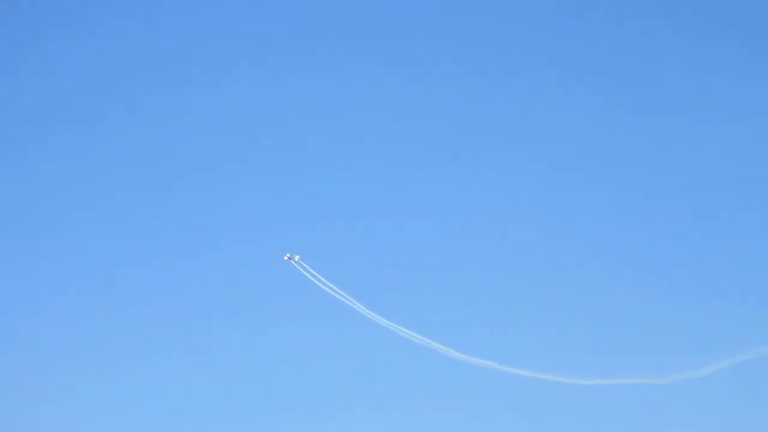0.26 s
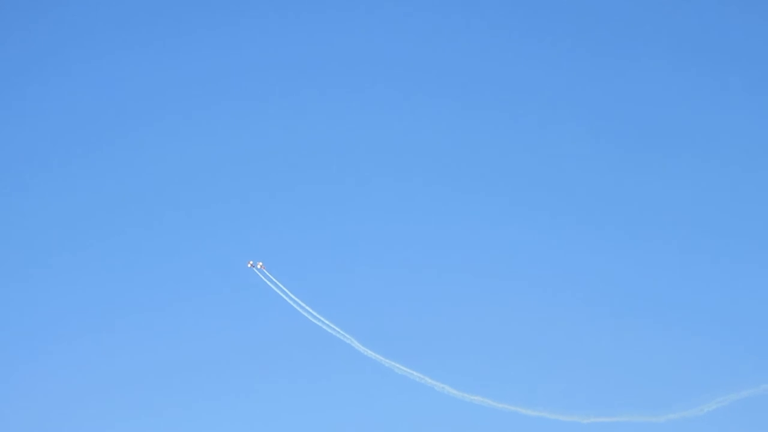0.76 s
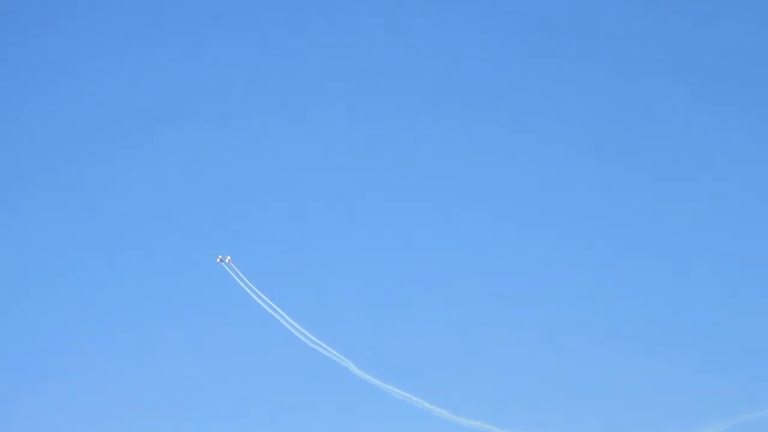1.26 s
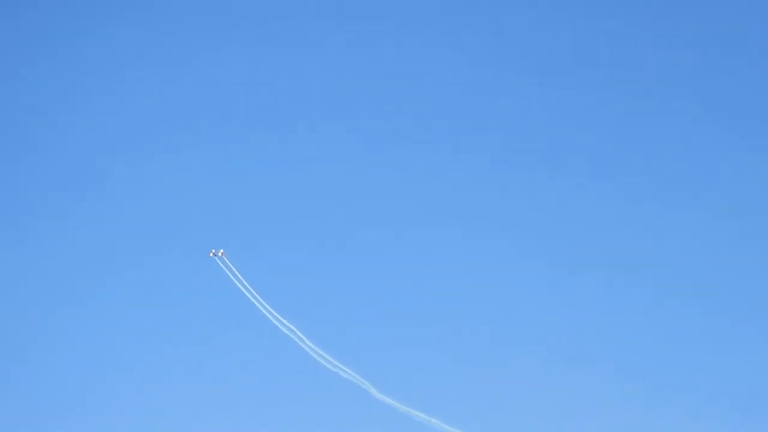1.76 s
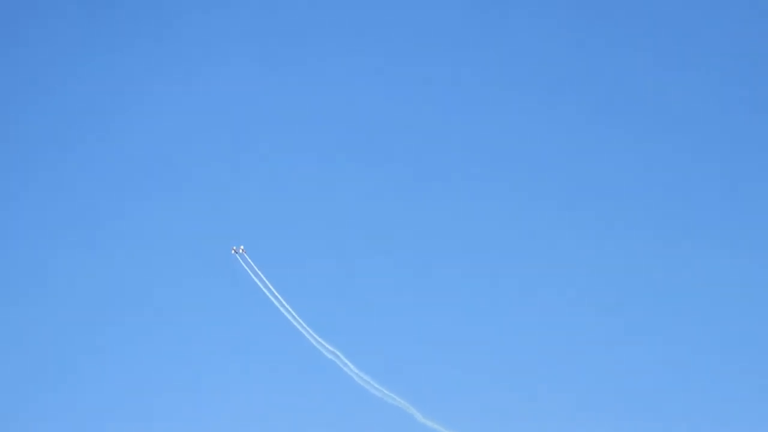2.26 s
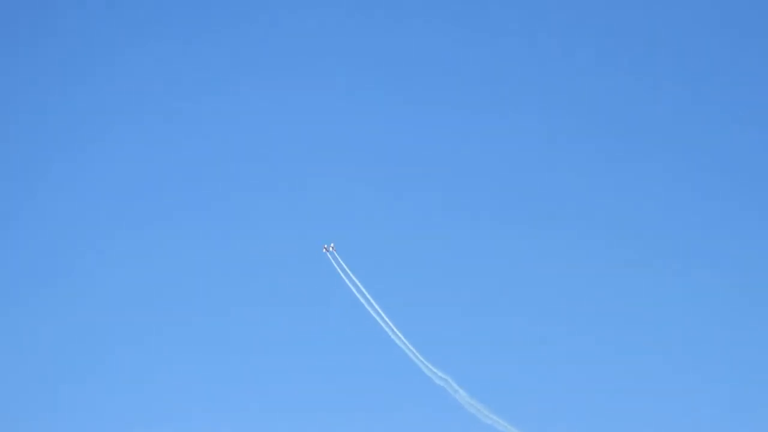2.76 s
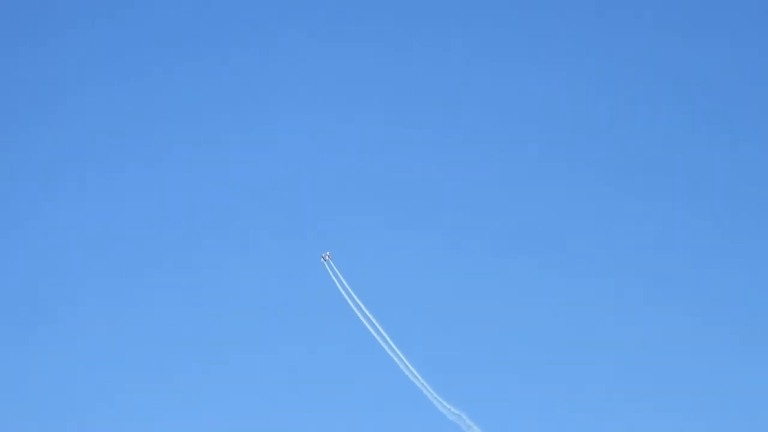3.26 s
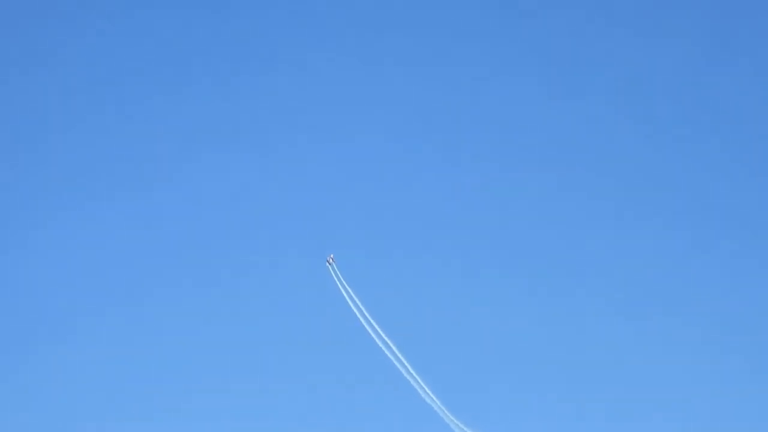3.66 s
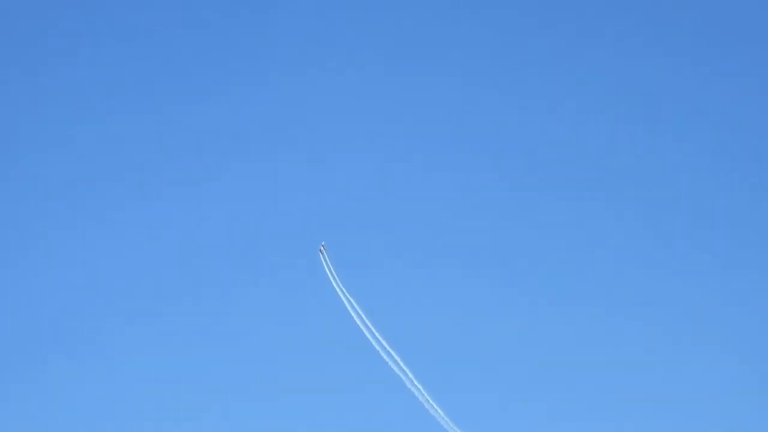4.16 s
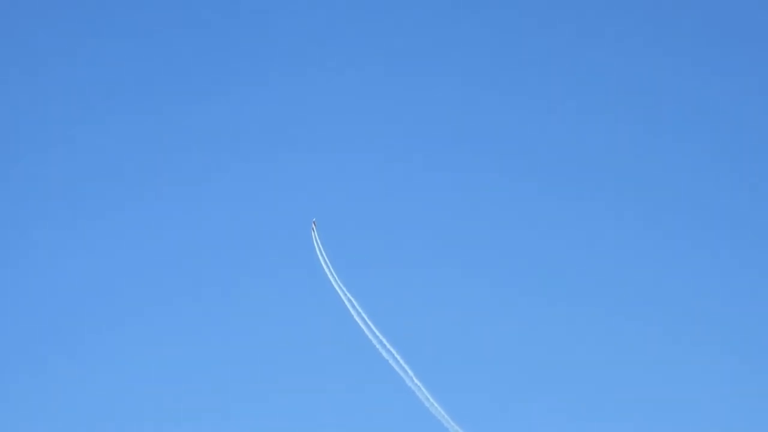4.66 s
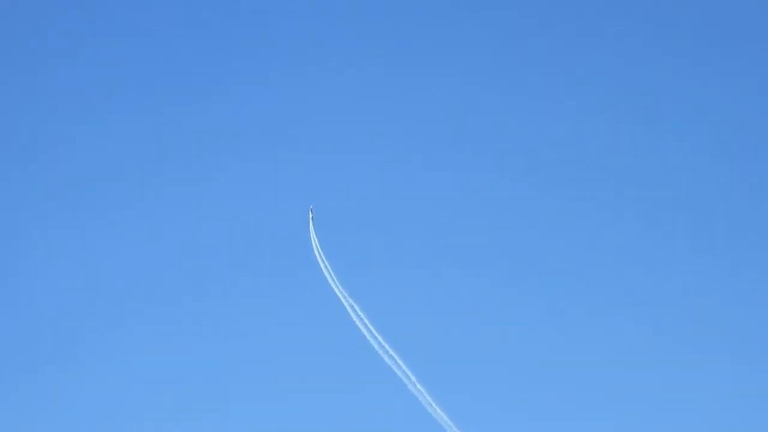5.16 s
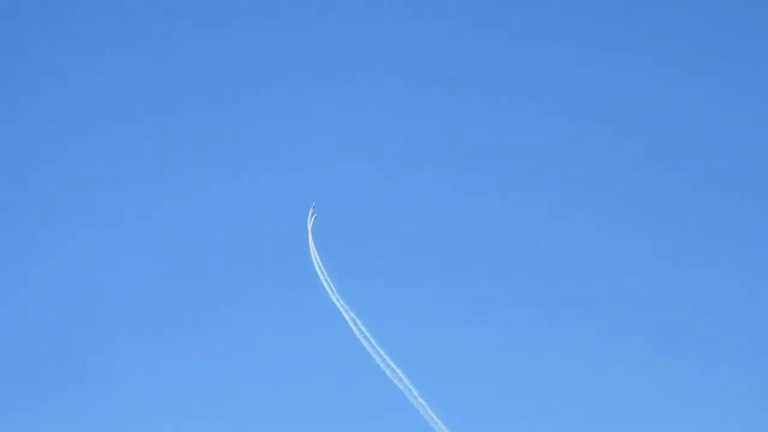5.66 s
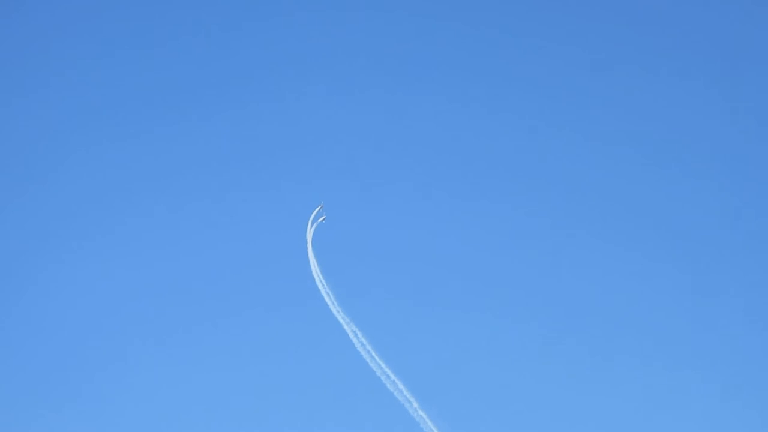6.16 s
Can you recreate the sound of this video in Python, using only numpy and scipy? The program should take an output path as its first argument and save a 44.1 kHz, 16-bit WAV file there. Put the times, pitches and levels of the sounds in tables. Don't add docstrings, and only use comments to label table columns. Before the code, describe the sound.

Distant twin propeller drone throbs and wavers across open sky, climbing slightly in pitch, with plastic handling clicks, soft insect hiss and one late knock.

```python
import sys
import numpy as np
from scipy import signal
from scipy.io import wavfile
from scipy.ndimage import uniform_filter1d

SR = 44100
rng = np.random.default_rng(int(sys.argv[2]) if len(sys.argv) > 2 else 0)


def dump(signal):
    limited = np.clip(np.atleast_2d(signal).T, -1, 1)
    pcm = np.round(limited * 32767).astype(np.int16)
    wavfile.write(sys.argv[1], SR, pcm)


def invert_db(x):
    u = np.asarray(x, float) / 20
    return 10 ** u


N = 282240

# freq_hz, level_db (per Hz)
AIR_COLOUR = [(20, -30), (45, -13.5), (85, -6), (125, -14.5), (200, -10.5), (300, -10.5), (600, -13.5),
              (1670, -21), (2600, -28.5), (4140, -34.5), (6000, -38), (8000, -39.5), (10500, -43.5),
              (15000, -50)]
AIR_DB = -44
# top_s, half_width_s, rise_db
WIND_GUSTS = [
    (.8, .8, -1),
    (3.6, .6, -3),
    (4.5, .3, 6),
    (5.25, .12, 15),
]
WIND_DB = -57
# centre_hz, width_hz, level_db
FUZZY_BANDS = [(8010, 680, -70.5), (1248, 46, -66.5), (1956, 28, -95), (9720, 1700, -74.5)]
# top_s, half_width_s, rise_db
CRICKET_BOUTS = [
    (.7, 0.28, 12),
    (1.13, 0.26, 18),
    (2, .35, 11),
    (6.4, 2.5, 7),
]
CRICKET_DB = -87
# top_s, half_width_s, rise_db
WHIRR_BOUTS = [
    (2.3, 0.42, 6.6),
    (4.4, 0.45, 4.5),
    (5.6, 0.96, 2.8),
]
WHIRR_DB = -63
# time_s, firing_hz, level_db
MOTOR_SPEED = [(0, 87.2, -48), (1.3, 89.74, -55.5), (2.8, 86.95, -55.5), (3.8, 85.9, -54),
               (4.6, 86.1, -54.5), (6.4, 88.3, -51.5)]
# multiple, level_db
MOTOR_ORDERS = [(2, -2), (3, -1), (4, -6.5), (5, -11), (6, -10.5)]
# start_s, length_s, start_hz, end_hz, level_db
BIRD_NOTES = [(.505, .045, 2950, 3480, -57), (.54, .045, 3520, 3490, -54.5), (.515, .04, 4600, 5200, -66),
              (.6, .09, 2030, 2020, -60), (.95, .07, 2020, 2020, -61), (3, .035, 660, 620, -47),
              (4.635, .06, 2350, 3050, -58), (4.7, .1, 2080, 2040, -61), (4.98, .14, 2390, 2340, -62.5),
              (5.13, .16, 1440, 1280, -51), (5.25, .12, 2250, 2440, -66), (5.39, .03, 3620, 3480, -61),
              (5.4, .05, 3050, 3240, -61), (5.52, .1, 3510, 3510, -65), (5.8, .27, 2800, 2790, -63)]
# start_s, peak_db
TICKS = [(0.467, -35), (0.4843, -38), (0.5066, -37), (0.5242, -38), (0.84, -41), (0.8672, -33.5),
         (0.9834, -39), (1.2311, -42), (1.267, -36), (1.9105, -40), (2.0023, -39), (2.0677, -38),
         (2.0941, -41), (2.1335, -36), (2.161, -35), (2.2016, -35), (2.4224, -40), (2.4695, -36),
         (2.496, -37), (2.5346, -37), (5.906, -35), (6.2028, -40), (6.2392, -37), (6.277, -37.5),
         (6.3056, -41)]
# freq_hz, level_db, t60_s
TICK_MODES = [(1330, 8, 0.017), (1800, -7, .012), (2040, -29, 0.0052), (2714, 13.5, 0.0082),
              (3140, 13.5, 0.0052), (3470, -8, 0.0033)]
# start_s, peak_db, low_edge_hz, high_edge_hz, t60_s
SNAPS = [
    (.8664, -50, 6500, 8500, .005),
    (.9837, -41, 7000, 11500, .005),
    (1.7907, -43, 6200, 16000, .004),
    (1.7962, -47, 10000, 16000, .004),
    (1.8205, -33, 6200, 15000, .005),
    (1.826, -47, 6000, 13000, .025),
]
# start_s, peak_db
KNOCK = (5.7612, -20)
# freq_hz, level_db, t60_s
KNOCK_MODES = [(1270, 0, .022), (1500, -3, .018), (1750, -4, .016), (2100, -5, .014), (2500, 0, .02),
               (2950, -2, .018), (3450, -6, .018)]
# top_s, half_width_s, rise_db, treble_rise_db
ROAR_SWELLS = [
    (.3, 0.56, 9.7, 12.5),
    (2.65, 0.23, 3.3, -6),
    (3.9, .25, 6.8, -6),
    (4.5, 0.55, 2.5, 3.5),
    (5.2, 0.17, 4.4, -4),
    (6.0, 0.19, 7.3, 7),
]
# freq_hz, level_db
ROAR_COLOUR = [(60, -25), (120, -21), (250, -4.5), (400, -12), (600, -1.5), (900, -4), (1400, -13.5),
               (2200, -26), (3500, -35.5), (6000, -63)]
ROAR_DB, TREBLE_DB = -47.5, 3.5
CRANK_LINES = [(0, .875), (0, 5.25), (1, 5.25), (1, 8), (0, 6.5), (1, 3.75), (1, 4.25), (1, 10)]
# top_s, half_width_s, top_db
CRANK_SWELLS = [(4, 2.1, -49), (4.3, 0.92, -56.5), (3.03, 1.6, -52), (1.95, .8, -54.5), (4.9, 0.53, -49),
                (.35, .35, -51), (.35, .35, -48), (6.06, 0.23, -52.5)]
CRANK_REST_DB = -69
# time_s, rate_hz
BLADES_A = [(0.0, 75.645), (0.44, 75.862), (0.99, 75.133), (1.49, 75.658), (2.04, 75.31), (2.82, 76.73),
            (2.95, 76.589), (3.88, 78.156), (4.49, 79.996), (4.98, 80.521), (5.35, 81.755), (6.4, 83.615)]
# time_s, rate_hz
BLADES_B = [(0.0, 79.621), (0.32, 81.157), (0.49, 81.106), (0.91, 77.33), (1.06, 76.985), (1.95, 78.793),
            (2.29, 78.926), (2.69, 81.427), (3.08, 81.217), (3.5, 83.503), (3.84, 83.666), (4.28, 82.554),
            (4.91, 84.061), (5.19, 85.108), (5.32, 85.273), (5.63, 83.561), (6.07, 87.713), (6.4, 89.276)]
# time_s, nearness_db, disc_edge_on_db, exhaust_facing_db
FLIGHT_A = [(0.0, -35.5, -0.5, 6), (0.98, -34.5, 0.3, 2.5), (1.23, -35, 0, -3.5), (1.48, -41, 2, 8.5),
            (1.72, -38.5, -2, 5.5), (1.97, -38, 0.7, 4.5), (2.22, -34.5, -0.5, 9), (2.46, -39, -3.8, 3.5),
            (3.45, -31.5, 1.5, -6.5), (3.69, -37, 3.5, 8.5), (4.43, -34.5, 2.0, -3), (4.92, -32, 6.5, -0.5),
            (5.42, -33.5, -0.5, -7.5), (5.66, -42.5, 8, 9), (5.91, -31, 0.5, -11), (6.4, -37, 8.5, -6)]
# time_s, nearness_db, disc_edge_on_db, exhaust_facing_db
FLIGHT_B = [(0.0, -35, -7, 1.5), (0.25, -35.5, -7.5, 5), (0.49, -31.5, -7.5, -2), (0.74, -40.5, -11, -7.8),
            (1.97, -37.5, -0.7, -8.5), (2.46, -31.5, 1.5, -7.5), (3.2, -34, 6.5, -0.5), (3.94, -31.5, 8, 8),
            (4.43, -37, 3, 7.5), (4.68, -35.3, 6, 11), (4.92, -29.5, 3.5, 3.5), (5.17, -32, 11.5, 7.5),
            (5.42, -40, 18, 11.5), (5.66, -33.5, 4.1, -1), (5.91, -40.5, 12, 11.5), (6.4, -36.5, 5.5, 11.5)]
# level_db, turn_share, exhaust_share
ORDERS_A = [(-1.5, -1.34, 0.28), (-9.5, 1.4, 0.24), (-7, 0.7, -0.14), (-15.5, 0.24, 1.22),
            (-18, 1.13, 1.06), (-20, -0.48, 0.6), (-23.5, -1.3, 0.33)]
# level_db, turn_share, exhaust_share
ORDERS_B = [(-1.8, -0.95, -0.058), (-7, 0.98, -0.16), (-6.5, 0.43, -0.08), (-14, -0.33, 1.02),
            (-15.5, 0.38, 0.68), (-22, -0.024, 1.1), (-22, -0.58, 0.42)]
# order, level_db
HALF_ORDERS = [(2.5, -19), (3.5, -12.5), (4.5, 0.5), (5.5, 1.5), (6.5, -6), (7.5, -18), (8.5, -6),
               (9.5, -11.5), (10.5, -9.5), (11.5, -12)]
SHAPES = [
    (.165, -1.9, -1.8),
    (.334, -1.7, -1.3),
]
# time_s, delay_ms, strength (0-1)
GROUNDS = [
    [(0, 2.97, 0.7), (1.5, 3.3, 1), (2.3, 3.55, 1), (2.7, 2.3, 0.4), (3, 2.33, .8), (3.4, 2.0, .4),
     (4.2, 1.8, 0.9), (4.6, 1.44, 0.26), (6.4, 1.3, 0.1)],
    [(0, 3.6, 0.25), (1.5, 3.24, .6), (2.2, 2.93, 0.8), (2.7, 2.4, 0.33), (3.1, 2.3, 0.74), (3.5, 1.8, .3),
     (4.5, 1, 0.34), (5.5, 2.7, .3), (6.4, 1.1, 0.46)],
]
# top_s, half_width_s, pipe_boom_db,
# uneven_firing_db
SURGES = [
    [(.3, 0.4, 1, -5), (1.9, 0.59, -14.5, 0), (4.2, .4, -8, 6), (5.3, .5, 7, -6)],
    [(.3, .3, 3.5, 4.5), (1.6, .5, -6, -1), (3.8, 0.3, 1.5, 7.5), (5.3, .6, 2, -6)],
]
# top_s, half_width_s, ring_db, bass_db
RINGS = [
    [(.3, .4, 3, -2), (4.9, .4, 8, -2), (6.25, 0.22, .5, -22)],
    [(.4, .5, -10, .5), (3.8, 0.37, 5, 2), (4.7, 0.24, 0, -1), (5.9, .2, -3, 2)],
]


def evened(x):
    return x / np.sqrt(np.mean(x ** 2) + 1e-20)


def curves(rows):
    s, *columns = np.transpose(rows)
    return [np.interp(np.arange(N) / SR, s, column) for column in columns]


def swells(rows):
    s, width, *rises = np.transpose(rows)
    bells = np.exp(-((np.arange(N) / SR - s[:, None]) / width[:, None]) ** 2)
    return [rise @ bells for rise in rises]


def drift(hz):
    f = np.geomspace(hz / 16, hz, num=16)[:, None]
    t = np.arange(0, N + 256, 256) / SR
    waves = np.sin(2 * np.pi * (f * t + rng.random(f.shape))) / f ** 0.34
    return np.interp(np.arange(N) / SR, t, evened(waves.sum(0)))


def noise(colour, patchy_db):
    frames, hz = N // 256 + 5, np.fft.rfftfreq(1024, 1 / SR)
    real, imag, patches = rng.standard_normal((frames, 513, 3)).T
    patches = uniform_filter1d(patches, size=8, axis=0)
    patches = evened(uniform_filter1d(patches, size=14, axis=1))
    f, db = np.transpose(colour)
    colour_db = np.interp(np.log(hz + 1), np.log(f + 1), db, right=-120)
    spectra = (real + 1j * imag) * invert_db(colour_db[:, None] + patchy_db * patches)
    return evened(signal.istft(spectra, nperseg=1024, noverlap=768)[1][:N])


def fuzz(hz, width):
    r = np.exp(-np.pi * width / SR)
    z = rng.standard_normal(N) + 1j * rng.standard_normal(N)
    z = signal.lfilter([1], np.convolve([1, -r], [1, -r]), z)
    return evened((z * np.exp(2j * np.pi * hz * np.arange(N) / SR)).real)


def tone(turns, db, lag=0):
    return np.sqrt(2) * invert_db(db) * np.cos(2 * np.pi * turns + lag)


def add(mix, s, sound):
    part = mix[round(s * SR):][:len(sound)]
    part += sound[:len(part)]


def soft_contact(t, rise_s):
    return np.sin(np.pi / 2 * np.minimum(t / rise_s, 1)) ** 2


def open_air():
    floor = invert_db(AIR_DB) * noise(AIR_COLOUR, patchy_db=1.0)
    return floor + sum(invert_db(db + 1.5 * drift(9)) * fuzz(hz, width) for hz, width, db in FUZZY_BANDS)


def wind():
    rumble = noise([(15, -6), (35, 0), (60, -3), (110, -14), (250, -40)], patchy_db=2)
    return invert_db(WIND_DB + swells(WIND_GUSTS)[0]) * rumble


def cricket():
    return invert_db(CRICKET_DB + swells(CRICKET_BOUTS)[0] + 2.0 * drift(30)) * fuzz(6950, 350)


def camera_drive():
    return invert_db(WHIRR_DB + swells(WHIRR_BOUTS)[0] + 2.0 * drift(17)) * fuzz(1640, 150)


def field_motor():
    hz, db = curves(MOTOR_SPEED)
    turns = np.cumsum(hz) / SR
    return sum(tone(k * turns + .05 * drift(3), db + order_db + 2.5 * drift(4))
               for k, order_db in MOTOR_ORDERS)


def birds():
    out = np.zeros(N)
    for s, length, start_hz, end_hz, db in BIRD_NOTES:
        u = np.linspace(0, 1, round(length * SR))
        hz = start_hz + (end_hz - start_hz) * (1 - (1 - u) ** 1.62)
        add(out, s, tone(np.cumsum(hz) / SR, db) * np.sqrt(np.sin(np.pi * u) + 1e-9))
    out = out * invert_db(1.2 * drift(70))
    echo_db, echo_t60_s = -11, 0.63
    t = np.arange(SR // 2) / SR
    tail = rng.standard_normal(len(t)) * invert_db(-60 * t / echo_t60_s)
    return out + invert_db(echo_db) * signal.oaconvolve(out, tail / np.linalg.norm(tail))[:N]


def ticks():
    out, t = np.zeros(N), np.arange(1200) / SR
    chance = rng.standard_normal((len(TICKS), len(TICK_MODES), 2))
    for (s, db), each in zip(TICKS, chance):
        ring = sum(invert_db(mode_db + 2.0 * a - 60 * t / t60) * np.sin(2 * np.pi * hz * (1 + 0.012 * b) * t)
                   for (hz, mode_db, t60), (a, b) in zip(TICK_MODES, each))
        ring = ring * soft_contact(t, .0007)
        add(out, s, invert_db(db) * ring / abs(ring).max())
    return out


def snaps():
    out, t = np.zeros(N), np.arange(1200) / SR
    for s, db, low_hz, high_hz, t60 in SNAPS:
        burst = rng.standard_normal(len(t)) * invert_db(-60 * t / t60)
        band = signal.butter(4, [low_hz, high_hz], "band", fs=SR, output="sos")
        crack = signal.sosfilt(band, burst)
        add(out, s, invert_db(db) * crack / abs(crack).max())
    return out


def knock():
    out, t = np.zeros(N), np.arange(2000) / SR
    s, peak_db = KNOCK
    ring = sum(invert_db(db - 60 * t / t60) * np.cos(2 * np.pi * hz * (t - .001)) for hz, db, t60 in KNOCK_MODES)
    ring = ring * soft_contact(t, .001)
    add(out, s, invert_db(peak_db) * ring / abs(ring).max())
    return out


def airframe_roar(turns, throb=0.12, limp=0.098):
    rise_db, treble_db = swells(ROAR_SWELLS)
    rush = noise(ROAR_COLOUR, patchy_db=1.5)
    high = signal.sosfilt(signal.butter(2, 1400, "high", fs=SR, output="sos"), rush)
    chop = 1 + throb * (np.cos(2 * np.pi * turns[0]) + np.cos(2 * np.pi * turns[1]))
    chop = chop + limp * np.cos(np.pi * (turns[1] + SHAPES[1][0]))
    return invert_db(ROAR_DB - 2) * (invert_db(rise_db) * (rush - high) + invert_db(TREBLE_DB + treble_db) * high) * chop


def cranks(turns):
    out = np.zeros(N)
    for (p, k), (s, width, top_db) in zip(CRANK_LINES, CRANK_SWELLS):
        swell_db = swells([(s, width, top_db - CRANK_REST_DB)])[0]
        out += tone(k * turns[p], CRANK_REST_DB + swell_db + 1.5 * drift(6))
    return out


def order_levels(flight, law, surges, rings):
    near, edge, pipe = curves(flight)
    *low, top, half = [near + db + a * edge + b * pipe for db, a, b in law]
    boom_db, uneven_db = swells(surges)
    ring_db, bass_db = swells(rings)
    low[0] = low[0] + bass_db
    low[3] = low[3] + boom_db
    half = half + uneven_db
    orders = list(enumerate(low, start=1))
    for k in range(6, 15):
        buzz_db = 5.5 * np.exp(-((k - 10.6) / 1.23) ** 2)
        fall_db = 4.5 * (k - 6.5)
        orders.append((k, top - fall_db + (k == 6) * ring_db + buzz_db))
    return orders + [(k, half + .35 * (half + 48) + db) for k, db in HALF_ORDERS]


def plane(hz, flight, law, shape, ground, surges, rings, shimmer_db=.45, wobble=.025):
    head_start, skew, bass_lag = shape
    turns = np.cumsum(hz) / SR
    delay_ms, strength = curves(ground)
    share = 2 * np.clip(strength, 0, 1) / (1 + strength ** 2)
    out = np.zeros(N)
    for k, db in order_levels(flight, law, surges, rings):
        comb = np.exp(-(k / 6.45) ** 2) * np.cos(2 * np.pi * k * hz * delay_ms / 1000)
        shaken_db = db + shimmer_db * np.sqrt(k) * drift(9)
        lag = skew + bass_lag / k ** 3 + wobble * k * drift(8) + .07 * k * drift(1.5)
        out += np.sqrt(1 + share * comb) * tone(k * (turns + head_start), shaken_db, lag)
    return out


def scene():
    hz = curves(BLADES_A) + curves(BLADES_B)
    turns = np.cumsum(hz, axis=1) / SR
    background = open_air() + wind() + cricket() + camera_drive() + field_motor() + birds()
    handling = ticks() + snaps() + knock()
    first = plane(hz[0], FLIGHT_A, ORDERS_A, SHAPES[0], GROUNDS[0], SURGES[0], RINGS[0])
    second = plane(hz[1], FLIGHT_B, ORDERS_B, SHAPES[1], GROUNDS[1], SURGES[1], RINGS[1])
    return (background + handling + airframe_roar(turns) + cranks(turns) + first + second)[None]


def top_cut(x):
    return signal.sosfilt(signal.butter(12, 15090, fs=SR, output="sos"), x)


def record(dry):
    return top_cut(dry)


dry = scene()
out = record(dry)
dump(out)
```